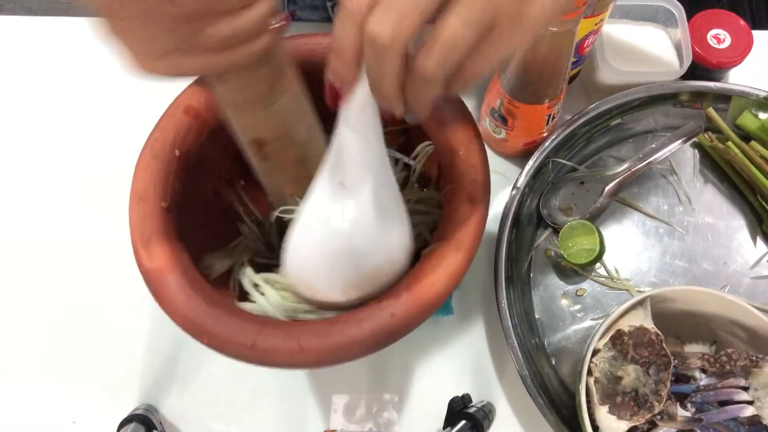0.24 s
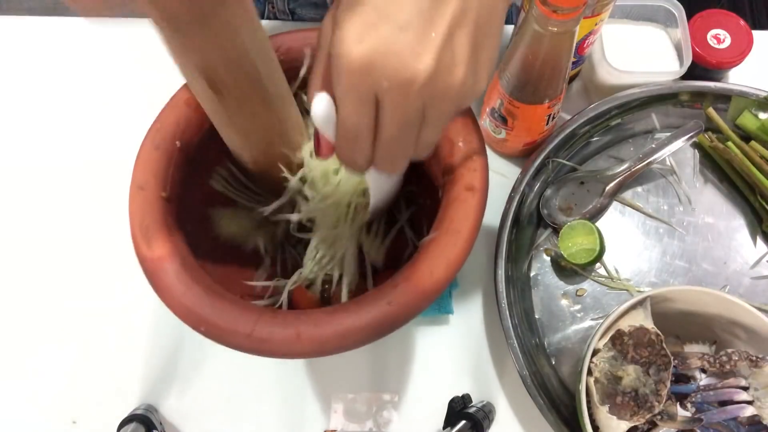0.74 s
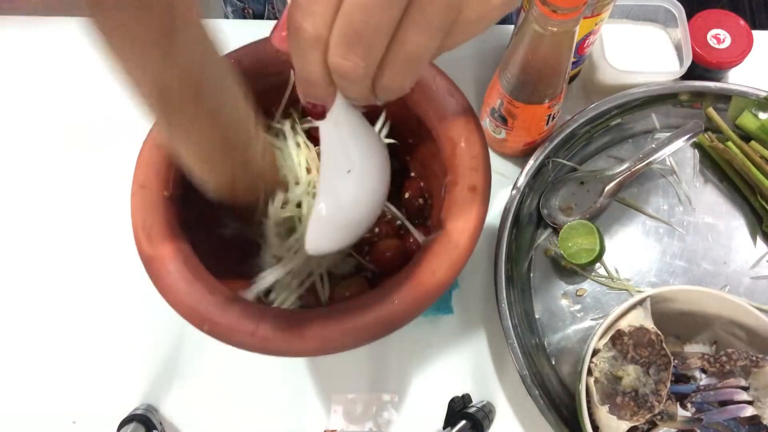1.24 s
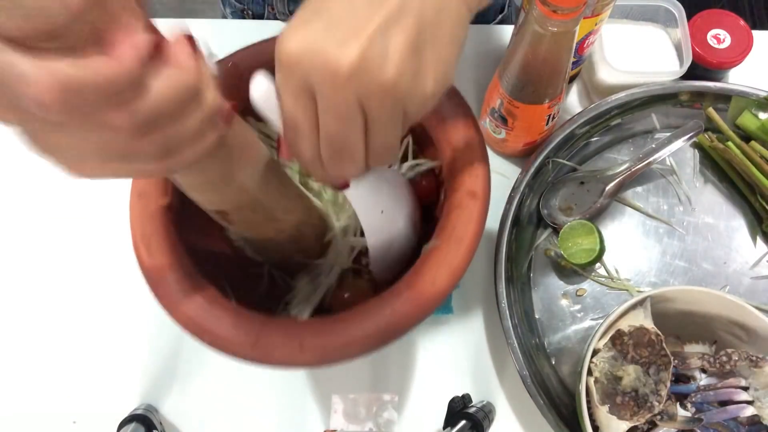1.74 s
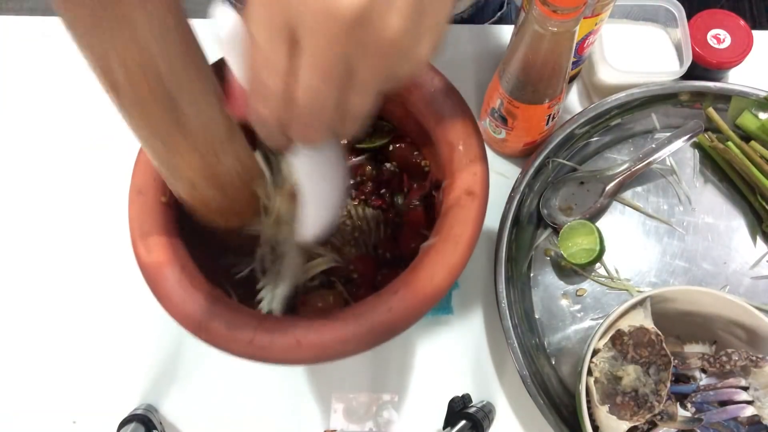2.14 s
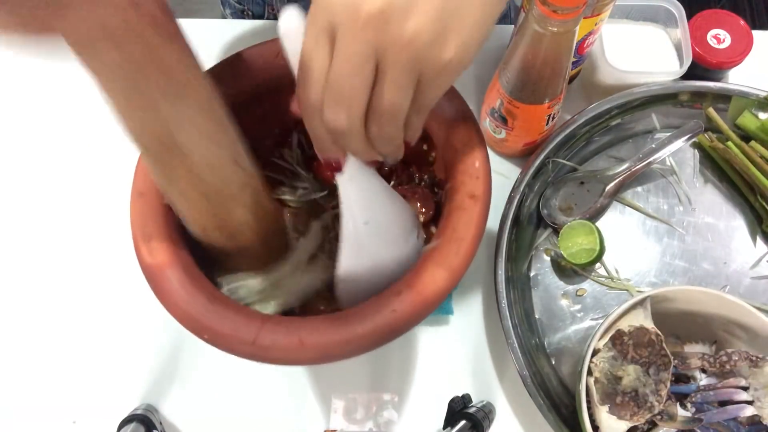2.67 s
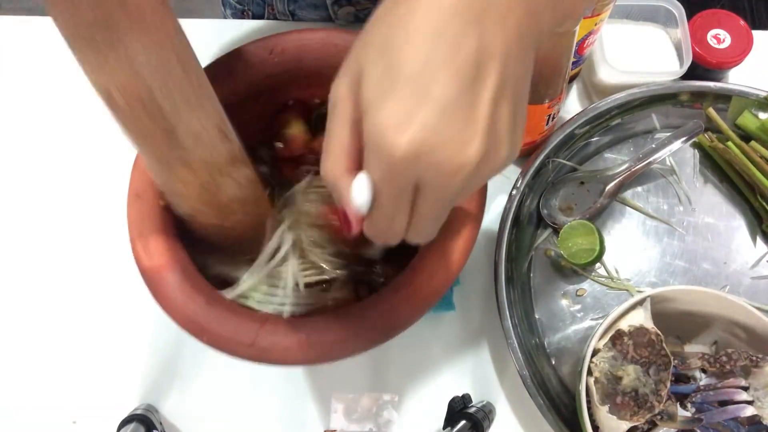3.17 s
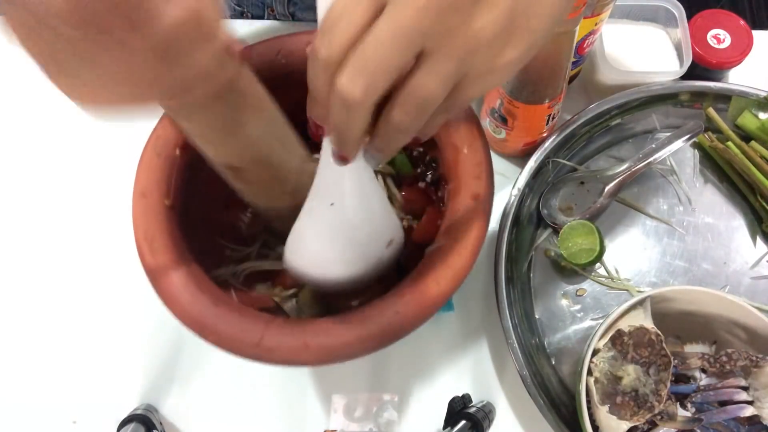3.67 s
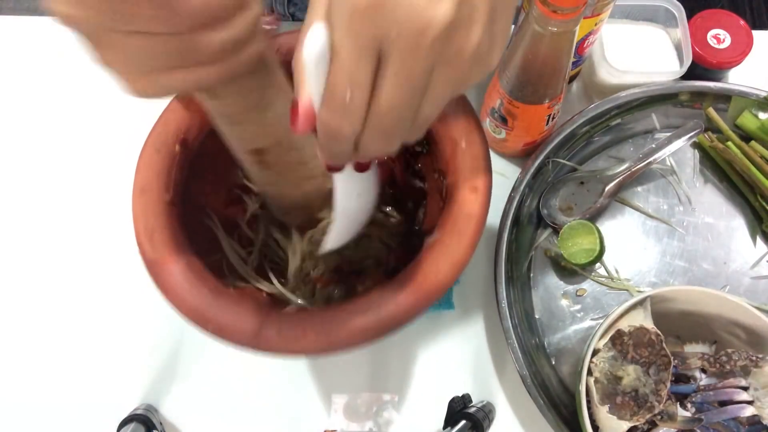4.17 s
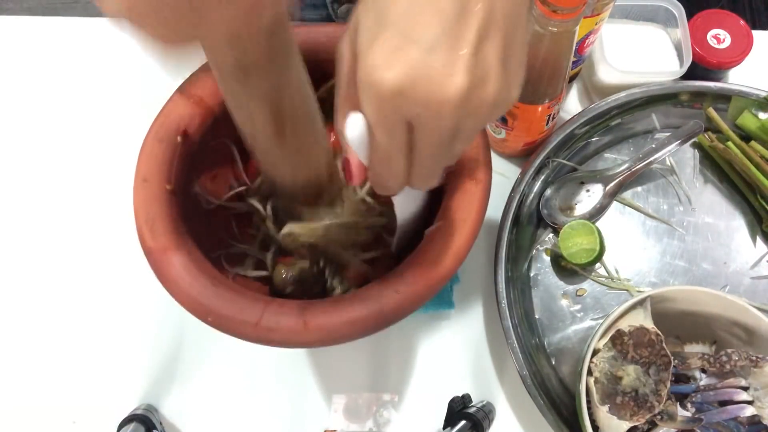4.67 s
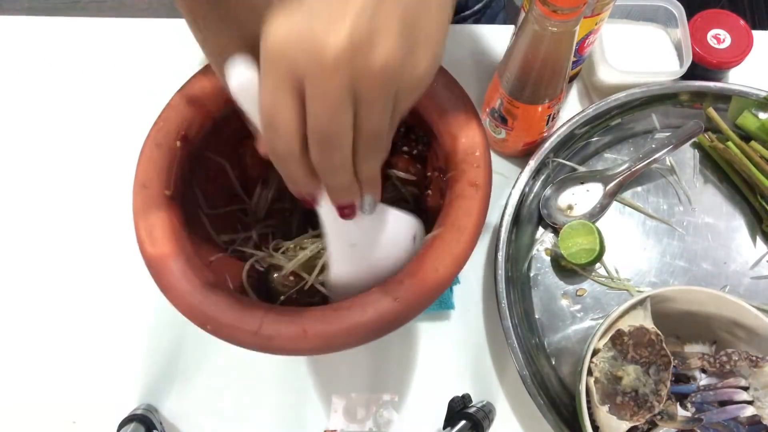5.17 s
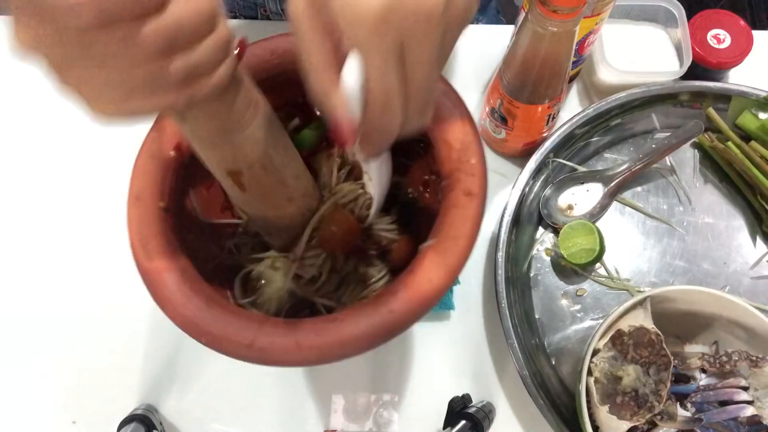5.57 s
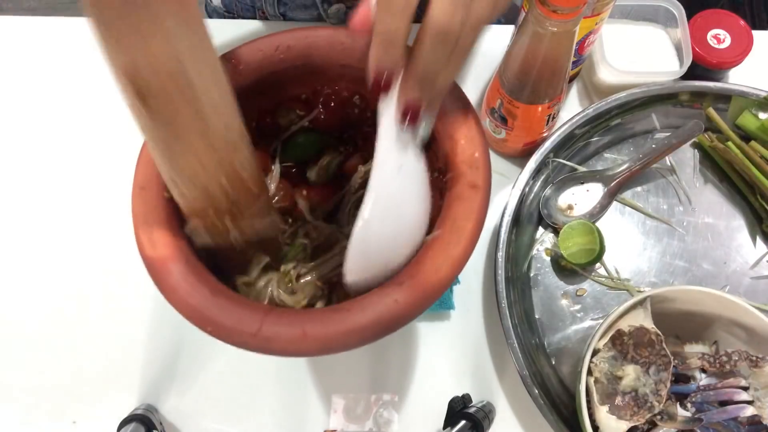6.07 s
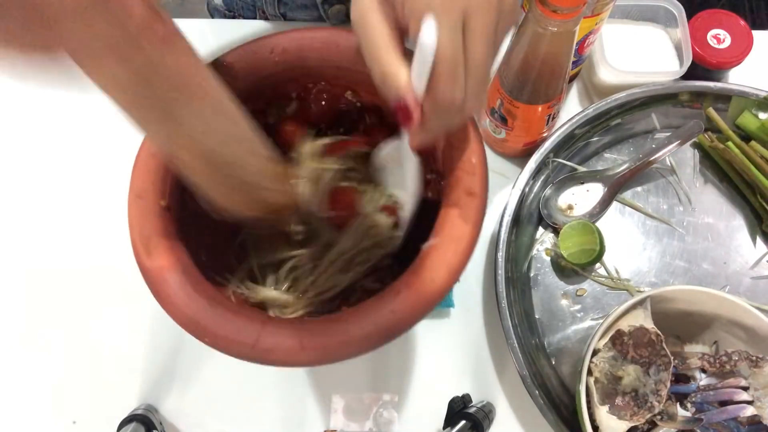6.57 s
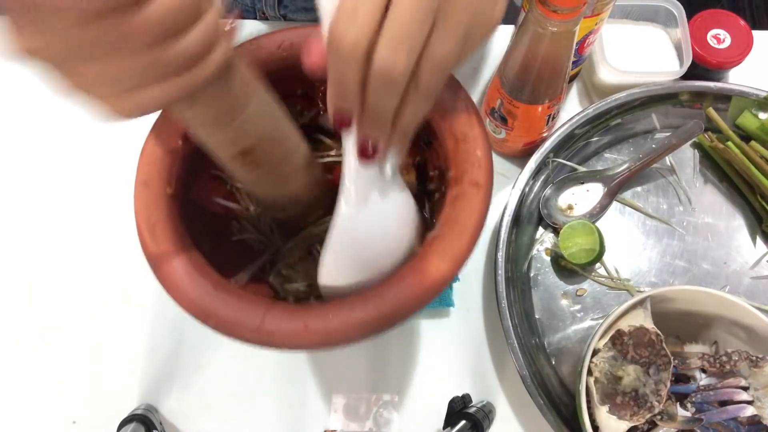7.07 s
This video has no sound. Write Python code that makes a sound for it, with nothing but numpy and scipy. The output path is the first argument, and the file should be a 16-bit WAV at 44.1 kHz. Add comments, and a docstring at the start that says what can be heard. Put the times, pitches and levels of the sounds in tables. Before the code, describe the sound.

A wooden pestle pounds wet shredded vegetable in a clay mortar for about seven seconds, heard close up. Soft, crunchy squelches repeat evenly, a little over three a second, with a faint slither of shreds between them. A plastic spoon clacks at 0.3 seconds. From 0.5 to 1.8 seconds the pestle knocks the wall repeatedly, making short, clear rings, loudest at 1.7. Further knocks come at 2.2 and 3.3 seconds. Soft, low thumps on the table fall near 1.8, 2.5 and 3.9 seconds. From 4 seconds on, wet pops and smacks become frequent, strongest around 6. The spoon clacks sharply at about 4.4, 5.1, 6.2 and 7.1 seconds, and gives brief gritty scrapes near 0.4, 2.8, 4.5 and 7.2. One last ringing pestle knock lands at 6.7 seconds. The small kitchen adds a short reverberation and a very faint appliance hum.

```python
"""A wooden pestle pounds wet shredded papaya in a clay mortar, about 3.4 strokes a second.
On its way down it often knocks the wall, which rings until the pressed salad chokes it.
The shreds squelch, air pockets pop, and now and then the mortar thumps on the table.
A plastic spoon clacks and scrapes on the clay and turns the shreds; a small kitchen hums and answers."""
import sys
import numpy as np
from scipy import signal
from scipy.fft import rfft, irfft, next_fast_len
from scipy.io import wavfile
from scipy.ndimage import uniform_filter1d, map_coordinates

SR = 44100
rng = np.random.default_rng(int(sys.argv[2]) if len(sys.argv) > 2 else 0)


def master_out(mix):
    """Clip the mix to full scale and print it as 16-bit PCM to the path in sys.argv[1]."""
    frames = np.transpose(np.atleast_2d(mix))
    ceiling = np.clip(frames, -1, 1)
    pcm = np.round(ceiling * 32767).astype(np.int16)
    wavfile.write(sys.argv[1], SR, pcm)


N = 322395

# Pestle knocks, mostly on the wall on the way down; a few dull ones are the pestle bottoming out: (time [s],
# level [dB], tilt [dB/octave], rim ring [dB], twin-mode share [0-1], wood note [dB])
KNOCKS = [(0.5064, -19, -0.7, -23, 0.83, -46), (0.7974, -22, 1, -11.5, 0.15, -24),
          (1.096, -20.5, 0, -9, 0, -50), (1.181, -20.5, -5, -43, 0.1, -52),
          (1.407, -43.5, -14, -34.5, 0, -36), (1.566, -33, 3, -31.5, 0, -60),
          (1.6839, -14.5, 2, -8, 0, -57), (1.753, -23.5, -3.5, -34.5, 0.1, -65),
          (2.2497, -25, 1.4, -23, 0.32, -17), (2.721, -30, -7, -34, 0, -55),
          (3.281, -24.5, 2, -22.5, 0.63, -6.5), (6.732, -17.5, 1.2, -19.5, 0.94, -5.5)]
# Dull tone of wood on clay: (frequency [Hz], level [dB])
KNOCK_EQ = [(20, -58), (70, -46.5), (150, -25), (300, -11.5), (450, -2), (560, 7.5), (720, -1), (950, 0),
            (1200, 1), (1500, -0.5), (2200, -7.5), (3300, -21), (8000, -41.5), (16000, -58.5)]


def pestle(wood_hz=937):
    """Wood knocks on clay: a dull attack, the ringing rim and the pestle's own brief note."""
    out = np.zeros(N)
    for s, db, tilt, ring_db, twin, wood_db in KNOCKS:
        add(out, s, strike(db, tilt, KNOCK_EQ, chatter_db=-9, chatter_t60=0.019, modes_db=-35))
        add(out, s, rim(s, ring_db, overtone_db=(db + ring_db) / 2 - 1.5, twin=twin))
        add(out, s, mode(wood_db, wood_hz, 0.036, seconds(SR // 4)))
    return out


# The mortar's modes besides those of the rim: (frequency [Hz], relative level [dB], t60 [s])
CLAY_MODES = [(350, -14.5, 0.52), (410.2, -11, 0.35), (562.5, -6, 0.14), (600.3, 1, 0.069),
              (1060, -4, 0.42), (1094.6, 8, 0.038), (1160, -14.5, 0.064), (2090, -30.5, 0.065),
              (2614, -13.5, 0.15), (3830, -13, 0.055), (4870, -4.5, 0.09), (5920, -4, 0.021),
              (7970, 14.5, 0.022), (8650, 14.5, 0.01), (10400, 11.5, 0.015), (11400, 12, 0.0074),
              (13350, 7.5, .015)]


def strike(db, tilt, eq, chatter_db, chatter_t60, modes_db, ping_db=0):
    """One contact: a push and a short chatter wake the clay's modes; ping lifts the highest ones."""
    t = seconds(SR // 3)
    force = amp(chatter_db - 60 * t / chatter_t60) * rng.standard_normal(len(t))
    force[0] += 1
    gain_db = lambda hz: along(eq, hz) + tilt * np.log2(np.clip(hz, 500, 8000) / 1000)
    blow = colour(force, gain_db)
    for (hz, level, t60), chance_db in zip(CLAY_MODES, rng.normal(0, 1.5, len(CLAY_MODES))):
        blow += mode(modes_db + level + chance_db + gain_db(hz) + ping_db * (hz > 5000), hz, t60, t)
    attack_rms = np.sqrt(np.mean(blow[:SR // 66] ** 2))
    return amp(db) * blow / attack_rms


RING_HZ, OVERTONE_HZ = 1089.5, 2812  # the rim's two bending modes


def rim(s, ring_db, overtone_db, twin=0.14, beat_hz=11.1, ring_t60=0.64, choked_t60=0.36):
    """The rim sings until the next stroke chokes it; slightly out of round, it beats with a twin mode."""
    t = seconds(SR // 2)
    next_stroke = min([row[0] for row in STROKES if row[0] > s], default=np.inf)
    free_s = max(next_stroke - s - 0.031, 0)  # the salad meets the wall just before the press peaks
    twin_free_s = free_s + 0.12  # the twin moves other parts of the wall and is choked later
    choke = lambda after: amp(-60 * np.maximum(t - after, 0) / choked_t60)
    ring = mode(ring_db, RING_HZ, ring_t60, t) * choke(free_s)
    ring += twin * mode(ring_db, RING_HZ + beat_hz, ring_t60, t) * choke(twin_free_s)
    # the overtone loses most of its strength at once, then lingers
    return ring + mode(overtone_db, OVERTONE_HZ, 0.04, t) + mode(overtone_db - 14.5, OVERTONE_HZ, 0.14, t)


# Pestle presses into the salad: (peak time [s], level [dB], rise [s], hollow body [dB re level])
STROKES = [(0.271, -35, .02, -18), (0.595, -40.5, 0.069, -11), (0.882, -39, 0.026, 4),
           (1.189, -30, 0.0083, 3.5), (1.487, -37.5, 0.033, 2.5), (1.782, -35, 0.021, 5.5),
           (2.041, -37.5, 0.022, 1), (2.528, -33, 0.02, 2.5), (2.822, -33.5, 0.032, -1),
           (3.088, -35.5, 0.019, 1.5), (3.418, -35, 0.024, 5), (3.679, -37.5, 0.023, 6),
           (3.953, -35, 0.028, 0.5), (4.227, -31, .017, 2), (4.501, -32.5, .018, 4.5),
           (4.784, -37, 0.02, -0.5), (5.068, -35.5, 0.015, 7.5), (5.336, -42.5, 0.04, 3),
           (5.645, -40.5, 0.026, 7), (5.938, -36.5, 0.019, 6), (6.275, -39.5, 0.048, 1.5),
           (6.53, -41, 0.029, 4.5), (6.846, -30.5, 0.017, 4.5), (7.123, -34.5, 0.019, 4.5)]
# The squelch's hollow body, juicy highs and fine spray, each: (frequency [Hz], level [dB])
BODY_EQ = [(150, -30.5), (380, -36), (600, 7), (800, -2.5), (1050, 2), (1400, 0.5), (2000, 3), (2700, -4.5),
           (3600, -7.5), (6000, -56)]
JUICE_EQ = [(1200, -27.5), (2300, -11), (3000, 1.5), (4200, -1), (6000, -3), (7500, -7), (10000, -30)]
FIZZ_EQ = [(4500, -41.5), (7500, 0), (10000, 4), (13000, 0), (16000, -11)]


def salad(sharpness=1.53, fall_over_rise=1.05, fizz_db=-10, tick_db=-8):
    """Each stroke crushes wet shreds into a squelch; in between, the spoon keeps them sliding."""
    t, presses = seconds(N), np.zeros((3, N))
    layers = (BODY_EQ, JUICE_EQ, FIZZ_EQ)
    for s, db, rise, body_db in STROKES:
        from_peak = np.maximum(s - t, (t - s) / fall_over_rise) / rise
        near = from_peak < 8
        layer_gains = amp(db + np.array([[body_db], [0], [fizz_db]]))
        presses[:, near] += layer_gains * np.exp(-from_peak[near] ** sharpness)
    fine = crackle(rate=6000, spread_db=5, clump_db=3, patchy_db=3)
    snaps = crackle(rate=160, spread_db=3, clump_db=1, patchy_db=6.5)  # single shreds breaking
    crush = sum(press * shaped(fine + 1.1 * snaps, eq) for press, eq in zip(presses, layers))
    slither = crackle(rate=14000, spread_db=3.5, clump_db=1.2, patchy_db=3)
    ticks = crackle(rate=25, spread_db=4, clump_db=1, patchy_db=6)  # single shreds letting go
    friction = slither + amp(tick_db) * ticks
    slide = sum(amp(db) * shaped(friction, eq) for db, eq in zip((-1, -4, -14), layers))
    return crush + stirring() * slide


# Spoon rests; one that ends before it starts dips less or not at all: (start [s], end [s])
RESTS = [(0.10, 0.17), (1.34, 1.37), (2.269, 2.56), (4.40, 4.44), (4.995, 4.96), (5.57, 5.6), (5.83, 5.87),
         (6.08, 5.05)]


def stirring(steady_db=-53.5, drag_db=-18, drag_s=0.045, rest_db=-14.5, ramp_s=0.04):
    """Envelope of the sliding shreds: steady under the spoon, swelling at strokes, ducked in rests."""
    t = seconds(N)
    dragged = sum(amp(db + drag_db) * np.exp(-np.abs(t - s) / drag_s) for s, db, _, _ in STROKES)
    from_rest = np.min([np.maximum(start - t, t - end) for start, end in RESTS], axis=0)
    return (amp(steady_db) + dragged) * amp(rest_db * np.clip(1 - from_rest / ramp_s, 0, 1))


# Large air pockets giving way: (time [s], burst peak [dB], centre [Hz])
POPS = [(1.24, -30, 1120), (2.141, -37, 3470), (3.199, -36, 1240), (4.011, -30, 1067), (4.209, -29, 1040),
        (4.302, -25.5, 1190), (4.316, -25.5, 1012), (4.496, -21.5, 1570), (4.871, -29, 990),
        (5.31, -23.5, 1397), (5.424, -31.5, 730), (5.712, -24.5, 1480), (5.93, -21.5, 770),
        (5.945, -20.5, 5140), (6.007, -15.5, 1524), (6.362, -22.5, 2550), (6.518, -25, 1650),
        (6.84, -24, 1060)]


def pops(t60=0.027, skirt_db_per_octave=9, bubble_db=-7, glide=0.12):
    """Wet smacks: a burst of juice and the note of an air pocket, rising as it opens."""
    out, t = np.zeros(N), seconds(SR // 10)
    bowl_eq = [(50, -51), (200, -39), (400, -18.5), (600, 7), (2500, 1), (14000, -18.5)]
    swell = amp(-60 * t / t60) * (1 - np.exp(-12 * t / t60)) ** 2
    for s, db, centre_hz in POPS:
        octaves_off = lambda hz: np.hypot(np.log2((hz + 1) / centre_hz), 0.5)
        gain_db = lambda hz: along(bowl_eq, hz) - skirt_db_per_octave * octaves_off(hz)
        burst = colour(rng.standard_normal(len(t)) * swell, gain_db)
        bubble = swell / swell.max() * np.sin(2 * np.pi * centre_hz * t * (1 + glide * t / t60))
        add(out, s, amp(db) * (burst / np.abs(burst).max() + amp(bubble_db) * bubble))
    return out


# The pestle bottoms out: (time [s], peak [dB])
THUMPS = [(1.755, -37.5), (2.513, -35.5), (3.335, -51), (3.897, -38.5), (3.924, -32.5)]
# Boxy tone of the table: (frequency [Hz], level [dB])
TABLE_EQ = [(30, -31), (100, -13.5), (200, -5.5), (350, -6), (550, 0), (900, -23), (3000, -39)]


def thumps(t60=0.054, attack_s=0.004):
    """The mortar thumps on the table: soft low blows, cushioned by the salad."""
    out, t = np.zeros(N), seconds(SR // 5)
    envelope = amp(-60 * t / t60) * (1 - np.exp(-t / attack_s))
    for s, db in THUMPS:
        thump = shaped(rng.standard_normal(len(t)) * envelope, TABLE_EQ)
        add(out, s, amp(db) * thump / np.abs(thump).max())
    return out


# Spoon hits: (time [s], level [dB], tilt [dB/octave], rim ring [dB], high ping [dB], chatter [dB])
CLACKS = [(0.2821, -23.5, 2.5, -45.5, -13, -19), (0.353, -32.5, -4, -44.5, -7, -17),
          (2.5088, -37, 14, -66, -14, -19), (2.6517, -41.5, 28, -50.5, 28, -36),
          (2.778, -38.5, 12, -41, -4, -7.5), (3.404, -33.5, 0.5, -40, 14, -30),
          (4.4493, -20, 2, -32.5, 11, -17), (5.1452, -19, 4, -31, -6.5, -27.5),
          (5.8903, -24.5, -4.5, -62, -18, -13.5), (6.159, -17.5, -0.4, -22, 20, -44),
          (6.256, -23.5, 12, -59, 15, -15), (7.114, -18, 2, -27, 11, -11.5)]
# Bright tone of plastic on clay: (frequency [Hz], level [dB])
CLACK_EQ = [(20, -68), (120, -50.5), (400, -7.5), (620, 6), (1100, -9.5), (1900, 8), (2600, 6), (3700, -1),
            (4800, -11), (5800, -4), (7000, -23.5), (8000, -23.5), (11000, -29), (16000, -28.5)]


def spoon_clacks():
    """Hard plastic clacks on the wall and brings out the rim's overtone."""
    out = np.zeros(N)
    for s, db, tilt, ring_db, ping_db, chatter_db in CLACKS:
        clack = strike(db, tilt, CLACK_EQ, chatter_db, chatter_t60=0.034, modes_db=-38, ping_db=ping_db)
        add(out, s, clack)
        add(out, s, rim(s, ring_db, overtone_db=ring_db + 11.5))
    return out


# Spoon drags: (start [s], length [s], level [dB])
SCRAPES = [(0.373, 0.075, -41), (2.647, 0.12, -50), (2.774, 0.15, -40), (4.543, 0.081, -36.5),
           (5.186, 0.17, -44.5), (6.272, 0.087, -53), (7.179, 0.11, -44)]
# Gritty tone of unglazed clay: (frequency [Hz], level [dB])
GRIT_EQ = [(400, -14), (600, 9), (1100, -16.5), (1500, -17), (2400, -18), (2850, 10), (3200, -11),
           (3750, -1.5), (4800, -6), (5800, 1.5), (6900, -6.5), (8200, -3.5), (9500, -8), (11900, -8.5),
           (15000, -18)]


def spoon_scrapes(wall_db=-6):
    """The spoon drags over the clay; every catch on the grit rings the wall's modes again."""
    drag, t = np.zeros(N), seconds(N)
    for s, length, db in SCRAPES:
        progress = np.clip((t - s) / length, 0, 1)
        drag += amp(db) * np.sqrt(np.abs(np.sin(np.pi * progress)))
    grit = crackle(rate=900, spread_db=4, clump_db=5, patchy_db=2)
    wall_hz = [OVERTONE_HZ] + [row[0] for row in CLAY_MODES]
    wall = sum(mode(0, hz, 0.012, t[:SR // 20]) for hz in wall_hz)
    ringing = unit(signal.fftconvolve(grit, wall)[:N])
    return drag * shaped(grit + amp(wall_db) * ringing, GRIT_EQ)


# Reverb decay of the kitchen: (frequency [Hz], t60 [s])
ROOM_DECAY = [(150, 0.66), (1000, 0.38), (4000, 0.32), (12000, 0.42)]


def kitchen(x, early_db=-17, tail_db=-18, echoes=9):
    """Table and near walls answer within 30 ms; then the room dies away."""
    hz, t, noise = signal.stft(rng.standard_normal(SR // 2), SR, nperseg=256)
    decay = amp(-60 * t / along(ROOM_DECAY, hz)[:, None])
    tail = signal.istft(noise * decay, SR, nperseg=256)[1]
    tail *= np.clip(seconds(len(tail)) / 0.036, 0, 1)
    tail = colour(tail, lambda hz: along([(2000, 2), (8000, -2)], hz))  # slightly darker throughout
    answer = amp(tail_db) * tail / np.linalg.norm(tail)
    for delay, size in zip(rng.uniform(0.004, 0.03, size=echoes), rng.standard_normal(echoes)):
        answer[int(delay * SR)] += amp(early_db) * size / np.sqrt(echoes)
    return signal.fftconvolve(x, answer)[:N]


# Appliance hum partials and the tone of the room's air, each: (frequency [Hz], level [dB])
HUM_PARTIALS = [(86.1, -80.5), (140.0, -65.5), (290.7, -75)]
AIR_EQ = [(20, -55), (40, -17), (58, -1.5), (100, -0.5), (160, -2), (250, -5.5), (500, -9.5), (1000, -16),
          (3000, -38.5), (8000, -29), (16000, -38.5)]


def room_tone(air_db=-59.5):
    """A bed of room air and the slightly unsteady hum of an appliance."""
    hum, t = np.zeros(N), seconds(N)
    for hz, db in HUM_PARTIALS:
        hum += amp(db + 1.5 * wobble(5)) * np.sin(2 * np.pi * hz * t + 0.86 * wobble(9.4))
    return hum + amp(air_db) * shaped(rng.standard_normal(N), AIR_EQ)


def crackle(rate, spread_db, clump_db, patchy_db):
    """Tiny snaps, rate a second, of uneven size and colour that come in clumps; rms 1."""
    snaps = (rng.random(N) < rate / SR) * rng.choice([-1, 1], N)
    size_db = spread_db * np.clip(rng.standard_normal(N), -2, 2) + clump_db * wobble(180)
    return unit(patchy(snaps * amp(size_db), patchy_db))


def patchy(x, depth_db, bins=6, frames=3):
    """Tiny cavities open and close: random resonances that come and go within milliseconds."""
    spectra = signal.stft(x, nperseg=512)[2]
    field = uniform_filter1d(rng.standard_normal(spectra.shape), bins, 0)
    field = uniform_filter1d(field, frames, 1)
    return signal.istft(spectra * amp(depth_db * unit(field)), nperseg=512)[1][:N]


def mode(db, hz, t60, t):
    """A damped vibration that builds up over its first cycle."""
    return amp(db - 60 * t / t60) * np.sin(2 * np.pi * hz * t) * (1 - np.exp(-(hz * t) ** 2))


def wobble(rate):
    """A smooth random curve with rate knots a second."""
    return map_coordinates(rng.standard_normal(int(N * rate / SR) + 4), [seconds(N) * rate])


def colour(x, gain_db, size=2048):
    """Minimum-phase EQ whose gain in dB is a function of frequency."""
    cepstrum = irfft(np.log(amp(gain_db(np.fft.rfftfreq(size, 1 / SR))) + 1e-6))
    cepstrum[1:size // 2] *= 2
    cepstrum[size // 2 + 1:] = 0
    return signal.fftconvolve(x, irfft(np.exp(rfft(cepstrum))))[:len(x)]


def shaped(x, eq):
    """x through an EQ curve, at rms 1."""
    return unit(colour(x, lambda hz: along(eq, hz)))


def along(points, hz):
    """Read (frequency [Hz], value) points on a log axis."""
    freqs, values = np.transpose(points)
    return np.interp(np.log(hz + 1), np.log(freqs + 1), values)


def amp(db):
    """Decibels to gain."""
    return 10 ** (np.asarray(db) / 20)


def unit(x):
    """Scale to rms 1."""
    return x / np.sqrt(np.mean(x ** 2) + 1e-20)


def seconds(count):
    """A time axis of count samples."""
    return np.arange(count) / SR


def add(track, s, x):
    """Mix x into the track at time s."""
    part = track[max(round(s * SR), 0):][:len(x)]
    part += x[:len(part)]


def scene():
    """The mortar up close, with kitchen reverb and room tone behind it, in mono."""
    mortar = pestle() + spoon_clacks() + spoon_scrapes() + salad() + pops() + thumps()
    return (mortar + kitchen(mortar) + room_tone())[None]


def record(dry):
    """A soft clip rounds off the highest peaks; a brick-wall low-pass trims the top."""
    top_hz = 16500
    rounded = dry / (1 + np.abs(dry) ** 6) ** (1 / 6)
    size = next_fast_len(N + SR // 4)
    passband = np.fft.rfftfreq(size, 1 / SR) < top_hz
    return irfft(rfft(rounded, size) * passband, size)[:, :N]


dry = scene()
out = record(dry)
master_out(out)
```